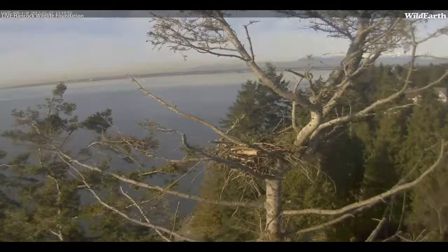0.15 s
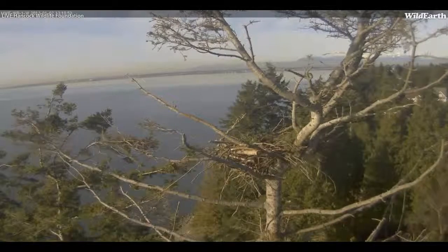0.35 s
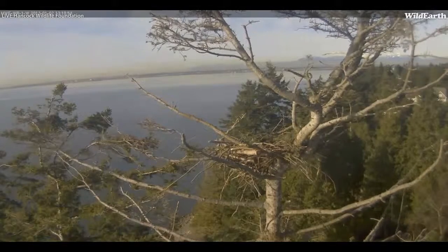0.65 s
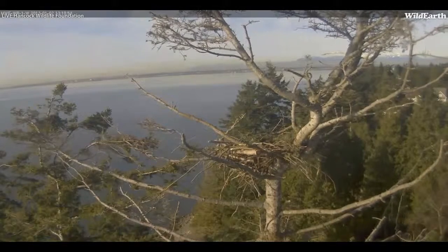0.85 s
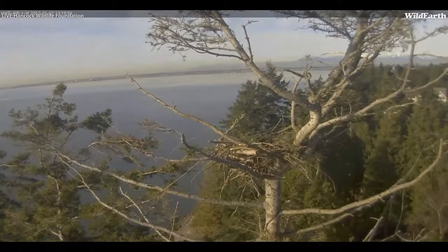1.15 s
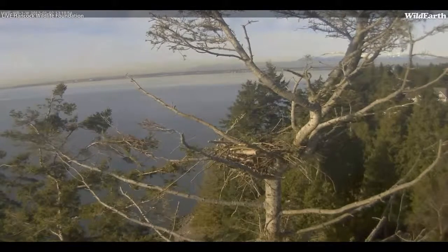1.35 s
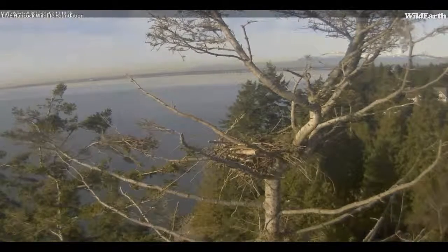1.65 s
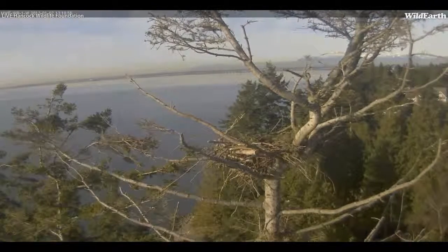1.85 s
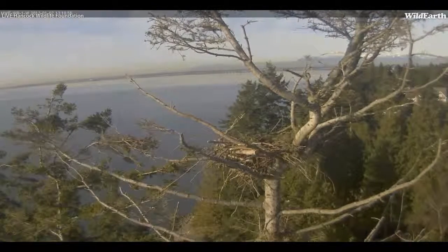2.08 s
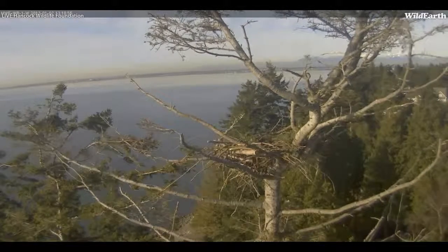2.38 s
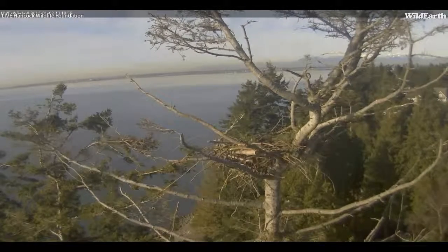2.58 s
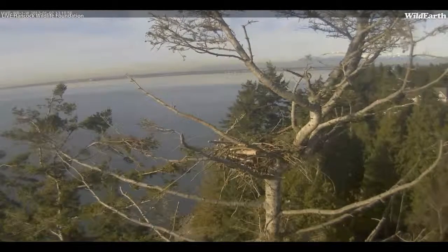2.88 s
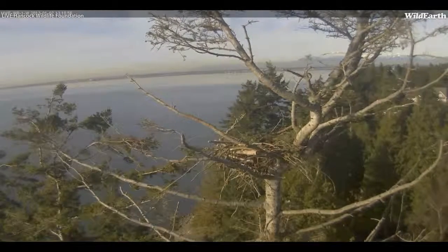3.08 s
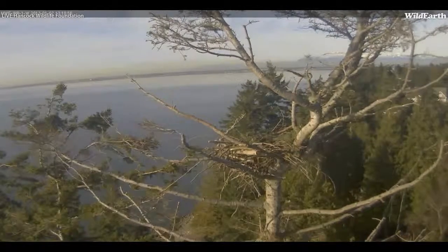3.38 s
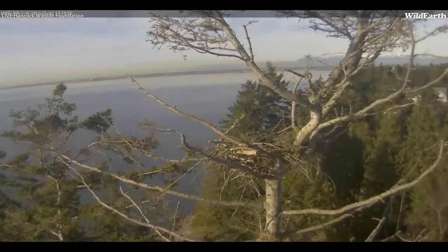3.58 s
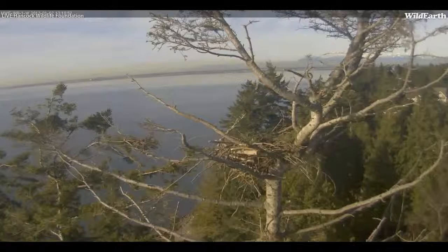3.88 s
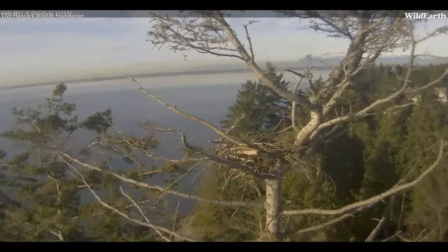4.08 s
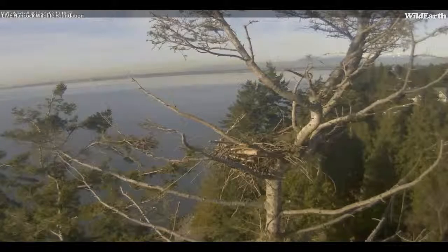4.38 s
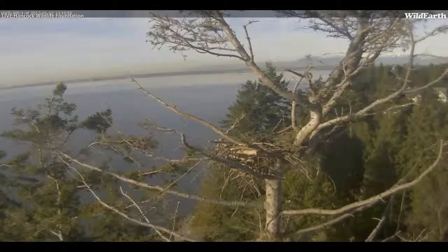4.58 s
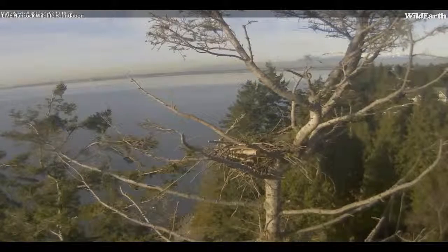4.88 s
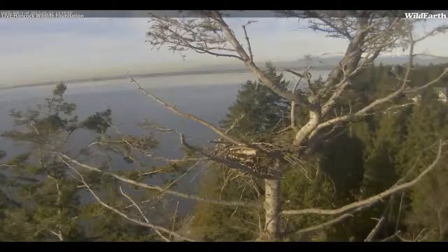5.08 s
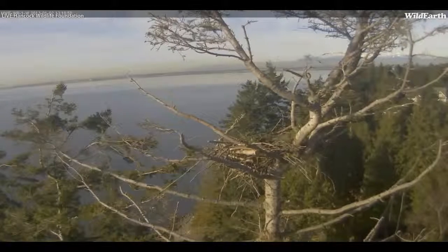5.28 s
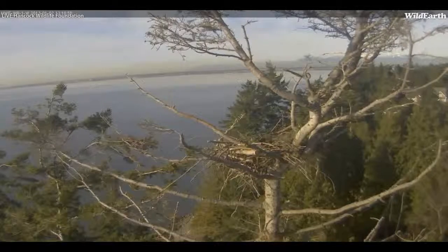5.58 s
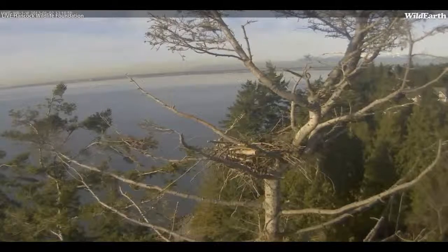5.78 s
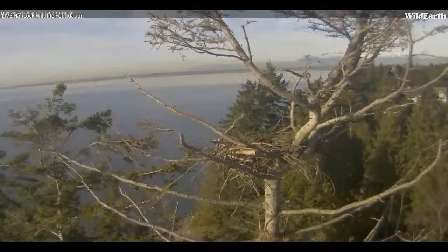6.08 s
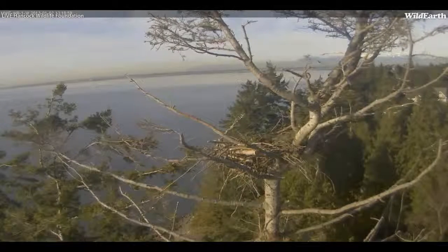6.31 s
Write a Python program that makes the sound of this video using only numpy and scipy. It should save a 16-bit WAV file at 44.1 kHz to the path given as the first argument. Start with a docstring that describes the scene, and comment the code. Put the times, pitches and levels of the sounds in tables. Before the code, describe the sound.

High in a tree outdoors, wind booms very low against the microphone mount, with small gusts, a steady soft hiss, a thin high whine and a distant low hum that swells around 1.6 s, then partly fades. At about 0.65 s a close eagle begins yelping: short piercing whistles that scoop up and leap higher, ending in a rasp and a brief croaky gasp. The first cracks into tiny squeaks. Eleven yelps run until about 3.3 s, their spacing tightening from 0.3 to 0.2 s. After a pause, a chatter starts at 4.0 s with a longer arching, grating whistle, then four quick cracked notes tumbling downward, and two plain peeps by 4.8 s. Wind alone fills the gap, with a gust near 5.1 s. A louder second chatter runs from 5.4 to 6.2 s, with five tumbling notes and two peeps. Faint forest echoes trail the calls.

```python
"""High in a nest tree, an eagle calls close to the camera's microphone; the forest echoes it throughout.
From 0.6 s whistled yelps climb through the registers, most ending in a rasp and a gasp; one cracks early.
From 4.0 s and again from 5.4 s a chatter opens with a long arch, tumbles in quick notes, ends in peeps.
All along, wind rumbles on the mount and hisses in the camera housing, beside a thin whine and a far drone.
Pure tones make the whistles, unsteady tones in a pipe the rasps, shaped noise the wind and part of the gasps."""
import sys
import numpy as np
from scipy import signal
from scipy.fft import rfft, irfft
from scipy.io import wavfile
from scipy.ndimage import uniform_filter1d

SR = 44100
rng = np.random.default_rng(int(sys.argv[2]) if len(sys.argv) > 2 else 0)


def generate_wav(sig):
    """Save sig (samples, or channels by samples) to the path in sys.argv[1] as 16-bit PCM at SR."""
    pcm = np.round(np.clip(np.atleast_2d(sig).T, -1, 1) * 32767).astype(np.int16)
    wavfile.write(sys.argv[1], SR, pcm)


N = 284445
TIME = np.arange(N) / SR  # s


def eagle():
    """The near bird: its syrinx whistles in registers or rasps when overblown, and its throat gasps."""
    yelp_tones, yelp_breaks = yelps()
    arch_tones, arch_breaks = arches()
    tumble_tones, tumble_breaks = tumbles()
    tones = yelp_tones + squawk() + arch_tones + tumble_tones + peeps()
    breaks = yelp_breaks + arch_breaks + tumble_breaks
    return whistles(tones) + rasps(breaks) + gasps()


# First run: each yelp scoops up, jumps to the middle and upper registers and breaks off in a rasp.
# Columns: scoop peak t/s, scoop level/dB, delay of the jump t/s, middle length t/s, middle f/Hz,
# landing accent level/dB, hold level/dB, its change over the note level/dB,
# upper length t/s, upper f/Hz, upper level/dB, rasp level/dB
YELP_NOTES = [(0.649, -32, 0.0051, 0.11, 3340, -19, -33.5, -20, 0.025, 4000, -40, -38),
              (0.938, -18.5, 0.007, 0.078, 3351, -15, -21.5, 8, 0.019, 4010, -35, -48),
              (1.223, -18, 0.011, 0.061, 3333, -16, -29.5, -3, 0.044, 4030, -44, -35.5),
              (1.514, -17.5, 0.018, 0.032, 3388, -24, -22, -6, 0.027, 3970, -29, -30),
              (1.785, -18.5, 0.0037, 0.049, 3394, -43, -22, 13, 0.031, 3985, -27.5, -36.5),
              (2.046, -17, 0.0014, 0.035, 3400, -35, -36.5, 0, 0.047, 3970, -26.5, -41),
              (2.287, -20, 0.00017, 0.021, 3364, -21.5, -39, 5.5, 0.033, 3957, -27.5, -32),
              (2.550, -16, 0, 0.05, 3440, -47, -33.5, 3, 0.041, 4050, -24, -35.5),
              (2.773, -17.5, 0.0013, 0.014, 3470, -39, -25.5, 3, 0.029, 4004, -23, -31),
              (3.013, -16, 0, 0.039, 3470, -30.5, -35, 1, 0.029, 4045, -22.5, -33),
              (3.217, -21, 0.00091, 0.047, 3393, -23, -15, 10, 0.068, 4100, -45.5, -46)]
# Roughness of the scoop, middle and upper registers [no unit]
YELP_ROUGHNESS = (.09, .07, .095)
YELP_SCOOP_HZ, YELP_SCOOP_S = (2516, 2687, 2833), 0.026  # pitch at start, middle and end; length
YELP_UPPER_BEND_HZ = 50  # the upper register starts and ends this much higher
FLARE_S = .0024  # half-width of the flare in each scoop


def yelps(upper_after_s=.01, upper_ramp_s=0.012, attack_s=0.019, release_s=0.012,
          scoop_ramp_s=0.0028, accent_after_s=0.0077, accent_width_s=0.0037, climb_hz=25,
          rasp_lead_s=0.0056, rasp_s=0.044, rasp_hz=3850, rasp_end_hz=2250):
    """A scoop flares across a windpipe resonance, two registers hold, and the voice gives out in a rasp."""
    tones, breaks = [], []
    scoop_rough, middle_rough, upper_rough = YELP_ROUGHNESS
    for (peak, scoop_db, jump_s, middle_s, hz, accent_db, hold_db, change_db,
         upper_s, upper_hz, upper_db, rasp_db) in YELP_NOTES:
        scoop_start = peak - YELP_SCOOP_S / 2
        scoop = envelope(YELP_SCOOP_S, scoop_db, scoop_ramp_s, scoop_ramp_s)
        scoop = scoop / np.hypot(1, (TIME[:len(scoop)] - YELP_SCOOP_S / 2) / FLARE_S)
        tones.append((scoop_start, scoop, YELP_SCOOP_HZ, scoop_rough))

        middle = envelope(middle_s, hold_db, attack_s, release_s, change_db)
        from_accent = (TIME[:len(middle)] - accent_after_s) / accent_width_s
        middle = middle + undb(accent_db) * np.exp(-np.square(from_accent))
        tones.append((peak + jump_s, middle, (hz - climb_hz, hz, hz + climb_hz), middle_rough))

        upper = envelope(upper_s, upper_db, upper_ramp_s, upper_ramp_s)
        edge_hz = upper_hz + YELP_UPPER_BEND_HZ
        tones.append((peak + upper_after_s, upper, (edge_hz, upper_hz, edge_hz), upper_rough))

        end = peak + max(jump_s + middle_s, upper_after_s + upper_s)
        breaks.append((end - rasp_lead_s, rasp_s, rasp_hz, rasp_end_hz, rasp_db))
    return tones, breaks


# Tiny squeaks in the crack of the first yelp.
# Columns: start t/s, length t/s, mid-note f/Hz, level/dB
SQUEAKS = [(.723, 0.0093, 6850, -36.5), (.729, 0.013, 5400, -33.5), (.736, 0.0052, 3280, -25),
           (.738, 0.025, 4040, -31.5), (.74, 0.0093, 4760, -34)]


def squawk(slide_hz=70, rough=0.39):
    """The cracking voice catches briefly on one windpipe resonance after another."""
    tones = []
    for start, length, hz, db in SQUEAKS:
        shape = envelope(length, db, length / 2, length / 2)
        tones.append((start, shape, (hz + slide_hz, hz, hz - slide_hz), rough))
    return tones


# The long arch that opens each chatter: up in two swells, a hold in the middle register, down.
# Columns: start t/s, rise length t/s, first swell level/dB, second swell level/dB,
# start to landing t/s, hold length t/s, hold level/dB, fall length t/s, fall level/dB
ARCH_NOTES = [(4.014, 0.034, -18, -28.5, .063, .047, -23.5, 0.022, -20.5),
              (5.426, 0.037, -9.5, -14.5, 0.066, 0.04, -24, 0.021, -16)]
# Pitch of the hold: start f/Hz, end f/Hz
HOLD_HZ = (3680, 3470)
# Pitch of the fall: start f/Hz, end f/Hz
FALL_HZ = (2940, 2725)


def arches(rise_hz=(2660, 3000, 3130), swell_at=(.31, .78), swell_width=0.21, sag_db=-1, rough=0.082,
           fall_swell_db=1, grate_hz=(4300, 4050), grate_db=-9,
           slip_s=0.016, slip_hz=(3900, 2950), slip_db=-10):
    """A rising whistle swells twice, leads into a long, grating hold and slips hoarsely into a descent."""
    tones, breaks = [], []
    for start, rise_s, first_db, second_db, fall_after_s, hold_s, hold_db, fall_s, fall_db in ARCH_NOTES:
        u = span(start, rise_s)[1]
        landing = start + fall_after_s
        rise = sum(undb(db) * np.exp(-np.square((u - at) / swell_width))
                   for db, at in zip((first_db, second_db), swell_at))
        tones.append((start, rise * swell(u, 0.92, .3), rise_hz, rough))
        tones += descent(landing, hold_s, hold_db, sag_db, HOLD_HZ, fall_s, fall_db, fall_swell_db, FALL_HZ,
                         dip_db=-12.5, dip_s=0.0047, attack_s=0.012, release_s=0.0053, throb_db=0.0)
        breaks.append((landing - hold_s, hold_s, *grate_hz, hold_db + grate_db))
        breaks.append((landing - slip_s / 2, slip_s, *slip_hz, hold_db + slip_db))
    return tones, breaks


# Quick notes that tumble from a rasp through the middle register and land on the low one.
# Columns: landing t/s, rasp length t/s, rasp level/dB, rasp top f/Hz, grating level/dB,
# middle length t/s, middle level/dB, its change over the note level/dB,
# low length t/s, low level/dB, its change over the note level/dB, final f/Hz
TUMBLE_NOTES = [(4.164, 0.047, -27.5, 6680, -29, 0.023, -29, 3, 0.0088, -22.5, -1, 2740),
                (4.283, 0.045, -29.5, 5660, -34.5, 0.018, -20, 8, 0.014, -20, 4, 2720),
                (4.395, 0.029, -34, 5300, -40, 0.025, -25, 9, 0.024, -15, 17, 2780),
                (4.506, 0.02, -30, 4460, -38, 0.015, -24.5, 13, 0.041, -18.5, -6, 2740),
                (5.583, 0.044, -22, 6850, -29.5, 0.015, -21.5, -2, 0.01, -22.5, -4.5, 2750),
                (5.69, 0.041, -25, 6780, -34.5, 0.036, -21, 14, 0.012, -12.5, 6.5, 2800),
                (5.792, 0.027, -26, 5730, -34, 0.021, -21.5, 6, .027, -12.5, 2, 2780),
                (5.908, 0.022, -31, 5300, -30, 0.013, -30.5, 3, 0.039, -14.5, -3, 2837),
                (6.035, 0.016, -36, 4450, -51, 0.0053, -39, 4, 0.029, -12, 6, 2796)]
# Pitch of the middle register: start f/Hz, end f/Hz
MIDDLE_HZ = (3674, 3635)
LANDING_HZ = 2961  # where the low register starts


def tumbles(linger_s=0.022, linger_lead_s=0.0029, linger_hz=(3750, 3500), linger_db=-10):
    """Each note cracks and descends, while a hoarse trace of the middle register lingers over the landing."""
    tones, breaks = [], []
    for (landing, rasp_s, rasp_db, top_hz, grate_db, middle_s, middle_db, swell_db,
         low_s, low_db, low_swell_db, final_hz) in TUMBLE_NOTES:
        breaks += crack(landing - rasp_s, rasp_s, rasp_db, top_hz, grate_db)
        trace_db = (middle_db + low_db) / 2 + linger_db
        breaks.append((landing - linger_lead_s, linger_s, *linger_hz, trace_db))
        tones += descent(landing, middle_s, middle_db, swell_db, MIDDLE_HZ,
                         low_s, low_db, low_swell_db, (LANDING_HZ, final_hz))
    return tones, breaks


def crack(start, length, db, top, grate_db, plunge_s=0.0066, plunge_share=0.75,
          dip_after_s=0.006, dip_s=0.01, dip_hz=(3400, 2750), dip_db=-2, grate_hz=(4500, 3800)):
    """The voice plunges from its top pitch, dips through the low registers and grates on above the middle."""
    return [(start, plunge_s, top, top * plunge_share, db),
            (start + dip_after_s, dip_s, *dip_hz, db + dip_db),
            (start + dip_after_s, length, *grate_hz, grate_db)]


# Roughness of the chatter: middle register, low register, extra at the landing [no unit]
CHATTER_ROUGHNESS = (.13, .045, .22)


def descent(landing, middle_s, middle_db, swell_db, middle_hz, low_s, low_db, low_swell_db, low_hz,
            slide_s=0.0027, dip_db=-12, dip_s=0.0043, attack_s=0.0076, release_s=0.0094, settle_s=0.0052,
            throb_hz=72, throb_db=6.0, throb_lead_s=0.0039):
    """One whistle can throb in the middle register, slides down weak and hoarse, and clears in the low one."""
    middle_rough, low_rough, landing_rough = CHATTER_ROUGHNESS
    shape = envelope(middle_s + low_s, 0, attack_s, release_s)
    t = TIME[:len(shape)] - middle_s  # s from the landing
    fallen = .5 + .5 * np.tanh(t / slide_s)  # 0 in the middle register, 1 in the low one

    def slide(middle, low):
        """Cross from one register's (start, end) line to the other's."""
        return (1 - fallen) * np.interp(t, [-middle_s, 0], middle) + fallen * np.interp(t, [0, low_s], low)

    db = slide((middle_db - swell_db / 2, middle_db + swell_db / 2),
               (low_db - low_swell_db / 2, low_db + low_swell_db / 2))
    dip = dip_db * np.exp(-np.square(t / dip_s))
    throb = (1 - fallen) * throb_db * np.cos(2 * np.pi * throb_hz * (t + throb_lead_s))
    hoarse = low_rough + landing_rough * np.exp(-np.abs(t) / settle_s)
    rough = (1 - fallen) * middle_rough + fallen * hoarse
    return [(landing - middle_s, shape * undb(db + dip + throb), slide(middle_hz, low_hz), rough)]


# Plain peeps in which each chatter dies away.
# Columns: start t/s, length t/s, top f/Hz, level/dB
PEEP_NOTES = [(4.617, 0.028, 2804, -17), (4.735, 0.024, 2750, -17.5), (6.064, 0.015, 2846, -16.5),
              (6.179, 0.027, 2820, -16)]


def peeps(attack_s=0.011, release_s=0.0063, rise_hz=170, fall_hz=170, rough=0.061,
          tail_hz=2150, tail_s=0.037, tail_db=-24, tail_rough=0.82):
    """One small arch of pitch in the low register, with a faint, deeper tail."""
    tones = []
    for start, length, hz, db in PEEP_NOTES:
        peep = envelope(length, db, attack_s, release_s)
        tail = envelope(tail_s, db + tail_db, attack_s, release_s)
        tones.append((start, peep, (hz - rise_hz, hz, hz - fall_hz), rough))
        tones.append((start + length, tail, (tail_hz,) * 3, tail_rough))
    return tones


# Strength of the octave overtone against the whistle. Columns: overtone f/Hz, level/dB
OCTAVE = [(5000, -21), (5450, -22.5), (5800, -32.5), (6300, -9.5), (6800, -33), (8000, -38)]


def whistles(tones, jitter_hz=330, shimmer=1.0, hiss_db=-31, waver_db=2.5):
    """The syrinx builds up a nearly pure tone on a glide or arc; roughness shakes its pitch and strength."""
    out = np.zeros(N)
    jitter, flutter = wander(1100), wander(240)
    hiss = coloured([(1200, -26.0), (2600, -2.0), (4000, -6.0), (6500, -5.0), (9000, -46.0)])
    for start, loudness, pitches, rough in tones:
        i = int(start * SR) + np.arange(len(loudness))
        u = np.linspace(0, 1, len(loudness))
        path = pitches if len(pitches) == len(u) else arc(pitches, u)
        hz = path + jitter_hz * rough * jitter[i]
        phase = 2 * np.pi * (np.cumsum(hz) / SR + rng.random())
        octave_gain = undb(np.interp(2 * hz, *np.transpose(OCTAVE)))
        tone = np.sin(phase) + octave_gain * np.sin(2 * phase)
        # more shimmer leaves the mean power alone
        strength = (1 + shimmer * rough * flutter[i]) / np.hypot(1, shimmer * rough)
        out[i] += loudness * (strength * tone + undb(hiss_db) * hiss[i])
    return out * undb(waver_db * wander(99))


# Spacing of the windpipe's resonances, wider in the fast chatter. Columns: t/s, spacing f/Hz
PIPE_SPACING = [(3.3, 679), (4.0, 731)]


def rasps(breaks, jitter_hz=380, shimmer=0.056, rasp_db=-3, reflection=0.45, ring_s=.02):
    """Overblown, the syrinx vibrates irregularly as its pitch drops through the windpipe's resonances."""
    out = np.zeros(N)
    jitter, flutter = wander(870), wander(660)
    for start, length, first, last, db in breaks:
        i, u = span(start, length)
        hz = first + (last - first) * u + jitter_hz * jitter[i]
        phase = 2 * np.pi * np.cumsum(hz) / SR
        buzz = swell(u, 0.38, 0.92) * (1 + shimmer * flutter[i]) * np.sin(phase)
        buzz = np.pad(buzz, (0, int(ring_s * SR)))  # room for the pipe to ring on
        spacing_hz = np.interp(start, *np.transpose(PIPE_SPACING))
        out[i[0]:i[0] + len(buzz)] += undb(db + rasp_db) * windpipe(buzz, spacing_hz, reflection)
    return out


def windpipe(x, spacing_hz, reflection):
    """Sound bounces between the ends of the pipe, which favours evenly spaced resonances."""
    round_trip = np.exp(-2j * np.pi * np.fft.rfftfreq(len(x), 1 / SR) / spacing_hz)
    reflection = np.clip(reflection, 0, .9)
    return irfft(rfft(x) * np.sqrt(1 - reflection ** 2) / (1 - reflection * round_trip), len(x))


# The eagle's gasps between notes.
# Columns: middle of the gasp t/s, length t/s, level/dB, lower wheeze f/Hz, its level against the upper/dB
GASP_BREATHS = [(0.741, .05, -36, 1398, -1.5), (0.787, .042, -30, 1174, 1.5), (1.04, .045, -38, 1145, -7),
                (1.305, .035, -38.5, 1163, -1), (1.619, 0.04, -27.5, 766, 1.5),
                (1.877, .042, -31, 804, 0.5), (2.123, .042, -31, 868, -9), (2.368, .04, -35.5, 900, -14),
                (2.625, .042, -36.5, 1205, 5), (2.855, .035, -37.5, 1370, -5),
                (3.083, 0.04, -32.5, 1406, 2)]
# Resonances of its open throat. Columns: f/Hz, width f/Hz, level/dB
THROAT_MODES = [(780, 6.7, -6), (940, 55, -8.5), (1280, 13, -19), (1450, 49, -4), (1895, 110, -13.5),
                (2400, 99, -12)]


def gasps(rush_db=-11, wheeze_hz=1665, wheeze_db=-8.5, jitter_hz=55, creak_db=3):
    """Short rushes of air ring the bird's throat, under two unsteady tones that make a croaky wheeze."""
    out, rush = np.zeros(N), resonant(THROAT_MODES)
    upper, lower = wander(190), wander(220)
    creak = undb(creak_db * wander(210))
    for middle, length, db, low_hz, low_db in GASP_BREATHS:
        i, u = span(middle - length / 2, length)
        upper_tone = sing(wheeze_hz + jitter_hz * upper[i])
        lower_tone = sing(low_hz + jitter_hz * lower[i])
        wheeze = upper_tone + undb(low_db) * lower_tone
        breath = undb(rush_db) * rush[i] + undb(wheeze_db) * wheeze
        out[i] += undb(db) * swell(u, 0.48, 0.56) * breath
    band = signal.butter(2, [600, 3200], "band", fs=SR, output="sos")
    return signal.sosfilt(band, out * creak)


# Reflections from the nest, the trunk and the forest.
# Columns: delay t/s, spread t/s, level/dB, share of the forest's colour [0 to 1]
REFLECTIONS = [(.004, 0.0098, -11, 0.15), (0.024, 0.035, -17, 0.45), (0.098, .13, -31, 1),
               (0.205, 0.059, -23.5, 1)]
# Colour of the forest's echo. Columns: f/Hz, level/dB
FOREST_COLOUR = [(2200, 3), (2740, -1), (2950, -6), (3150, -0.5), (3310, 7.5), (3390, -3), (3650, -4.5),
                 (4100, -2.5)]


def forest(x):
    """Each reflection is a cluster of small scattered echoes; the far ones take on the forest's colour."""
    t = TIME[:SR]
    response = np.zeros(SR)
    colour_db = np.interp(np.fft.rfftfreq(SR, 1 / SR), *np.transpose(FOREST_COLOUR))
    for delay, spread, db, share in REFLECTIONS:
        cluster = rng.standard_normal(SR) * (t > delay) * np.exp(-np.abs(t - delay) / spread)
        cluster = cluster / np.linalg.norm(cluster)
        response += irfft(rfft(cluster) * undb(db + share * colour_db), SR)
    return x + signal.fftconvolve(x, response)[:N]


# Spectrum of the shaken mount. Columns: f/Hz, level per Hz/dB
MOUNT_SPECTRUM = [(12, -32), (25, -7.5), (32, 11.5), (40, 7.5), (46, 13), (55, -11.5), (70, -23),
                  (110, -49), (600, -110)]
# Gusts on the mount. Columns: peak t/s, half-width t/s, rise of the level/dB
MOUNT_GUSTS = [(0.579, 0.054, 6.5), (1.8, 0.21, 3.5), (2.261, 0.048, 8.5), (4.201, 0.14, 5.5),
               (5.07, 0.038, 10.5), (5.801, 0.47, 7)]
BREEZE_DB = -26.5  # level of the rumble between gusts


def rumble(steady_s=0.17):
    """Gusts shake the mount, which booms at its low resonance."""
    boom = coloured(MOUNT_SPECTRUM)
    boom = boom / np.sqrt(uniform_filter1d(boom ** 2, int(steady_s * SR)))  # even out chance swells
    gust_db = sum(db * np.exp(-np.square((TIME - peak) / width)) for peak, width, db in MOUNT_GUSTS)
    return boom * undb(BREEZE_DB + gust_db)


# Spectrum of the wash. Columns: f/Hz, level per Hz/dB
WASH_SPECTRUM = [(25, 0), (58, 9), (80, 4.5), (110, -7), (185, -7.5), (300, -18), (700, -23.5), (1150, -24),
                 (1900, -29.5), (3800, -31), (6000, -30.5), (7400, -31.5), (8100, -40.5), (8700, -40)]
# Resonances of the camera housing. Columns: f/Hz, width f/Hz, level/dB
HOUSING_MODES = [(487, 43, -0.5), (1028, 42, -3), (1174, 12, 1), (1658, 90, -4), (2195, 83, -1.5),
                 (2710, 67, -14), (4210, 180, -15.5), (5080, 140, -9.5), (5340, 330, -20.5)]
AIR_DB = -39.5  # gain of wash and housing together


def air(wash_db=10, housing_db=-5.5, rise_db=5.0, rise_s=4.64):
    """A steady wash of wind and distant shore; the part that rings in the housing slowly grows, then holds."""
    wash = coloured(WASH_SPECTRUM) * undb(wash_db)
    growth_db = np.interp(TIME, [0, rise_s], [-rise_db, 0])
    ring = resonant(HOUSING_MODES) * undb(housing_db + growth_db)
    return undb(AIR_DB) * (wash + ring)


# Course of the thin whine, before its flutter. Columns: t/s, level/dB
WHINE_LEVEL = [(0, -50.5), (.3, -55), (.5, -46), (.7, -50.5), (1.2, -50.5), (2.5, -53), (6.4, -54)]


def whine(hz=2200, waver_db=2, swell_db=2.5):
    """A thin tone, nearly steady in pitch, flutters and swells in strength and is weaker towards the end."""
    drift_hz = 1.5 * wander(12)
    db = np.interp(TIME, *np.transpose(WHINE_LEVEL)) + waver_db * wander(25.0) + swell_db * wander(4.0)
    return undb(db) * sing(hz + drift_hz)


# Course of the far-off drone. Columns: t/s, level/dB
DRONE_LEVEL = [(.4, -56), (.9, -44), (1.6, -38.5), (2.3, -40), (3.4, -44.5)]


def drone(hz=128, drift_hz=4):
    """A low hum, wavering in pitch, swells in the distance and partly fades."""
    return undb(np.interp(TIME, *np.transpose(DRONE_LEVEL))) * sing(hz + drift_hz * wander(7.4))


def undb(db):
    """Decibels to gain."""
    return 10 ** (np.asarray(db) / 20)


def unit(x):
    """Scale to rms 1."""
    return x / np.sqrt(np.mean(x ** 2))


def noise(gain):
    """Noise of rms 1 whose spectrum follows gain(Hz)."""
    hz = np.maximum(np.fft.rfftfreq(N, 1 / SR), 1)
    return unit(irfft(rfft(rng.standard_normal(N)) * gain(hz), N))


def coloured(points):
    """Noise with a spectrum of (f/Hz, level/dB) points."""
    at, db = np.transpose(points)
    return noise(lambda hz: undb(np.interp(np.log(hz), np.log(at), db)))


def resonant(modes):
    """Noise ringing in (f/Hz, width f/Hz, level/dB) resonances."""
    def gain(hz):
        """The powers of the resonances add."""
        return np.sqrt(sum(undb(db) ** 2 / (1 + ((hz - f * f / hz) / width) ** 2) for f, width, db in modes))
    return noise(gain)


def wander(rate_hz):
    """Random motion of spread 1, mostly slower than the given rate."""
    return noise(lambda hz: 1 / (1 + np.square(np.square(hz / rate_hz))))


def sing(hz):
    """A pure tone that follows a pitch path."""
    return np.sin(2 * np.pi * np.cumsum(hz) / SR)


def arc(pitches, u):
    """A smooth pitch path through its start, middle and end."""
    return np.polyval(np.polyfit([0, .5, 1], pitches, 2), u)


def span(start, length):
    """Sample indices of an event and its progress from 0 to 1."""
    i = np.arange(int(start * SR), min(int((start + length) * SR), N))
    return i, np.linspace(0, 1, len(i))


def swell(u, crest, power):
    """A rounded rise and fall that peaks at the crest."""
    bent = np.interp(u, [0, np.clip(crest, .05, .95), 1], [0, .5, 1])
    return np.maximum(np.sin(np.pi * bent), 0) ** power


def envelope(length, db, attack, release, change_db=0):
    """A smooth attack, a hold that may swell or sag, and a smooth release."""
    t = np.arange(int(length * SR)) / SR
    ramps = np.clip(t / attack, 0, 1) * np.clip((length - t) / release, 0, 1)
    return undb(db + change_db * (t / length - .5)) * np.sin(np.pi / 2 * ramps)


def scene(pan_db=0.93, hiss_db=-66):
    """Bird and mount are a little stronger on the left; each channel adds its own faint hiss."""
    near = forest(eagle()) + rumble()
    hiss_spectrum = [(60, 24.0), (200, 12.5), (600, -7), (3000, 1.5), (8000, 1.0)]
    hiss = np.array([coloured(hiss_spectrum) for _ in range(2)])
    pan = undb(np.array([[pan_db], [-pan_db]]) / 2)
    return near * pan + air() + whine() + drone() + undb(hiss_db) * hiss


TOP_HZ = 8650  # upper edge of what the camera passes


def record(dry):
    """The camera cuts the top steeply."""
    low_pass = signal.ellip(12, .2, 60, TOP_HZ, fs=SR, output="sos")
    return signal.sosfilt(low_pass, dry)


dry = scene()
out = record(dry)
generate_wav(out)
```